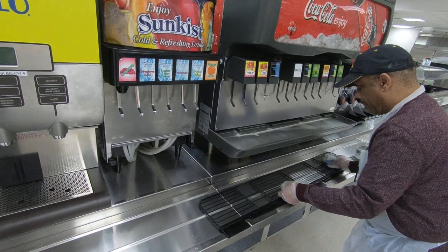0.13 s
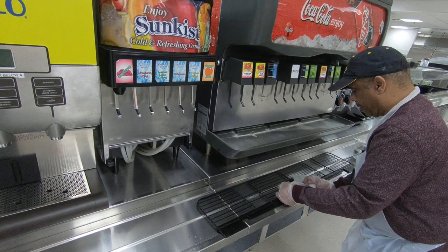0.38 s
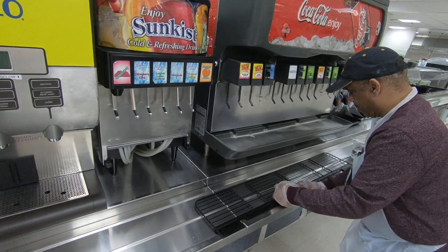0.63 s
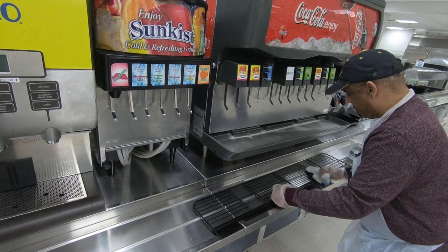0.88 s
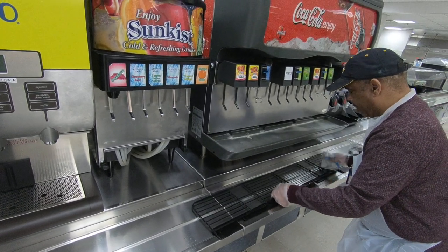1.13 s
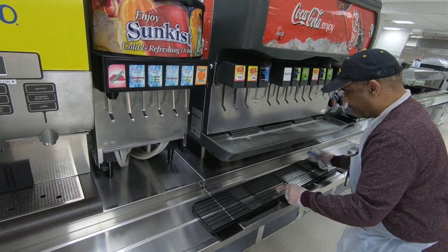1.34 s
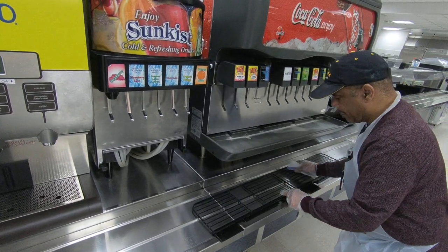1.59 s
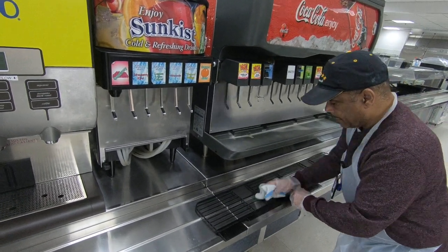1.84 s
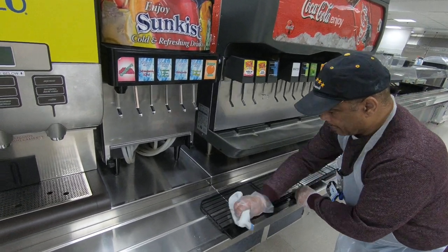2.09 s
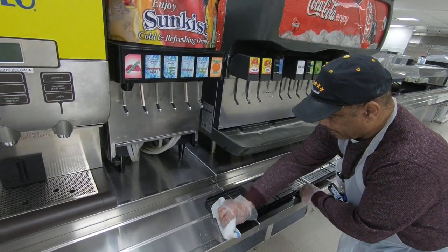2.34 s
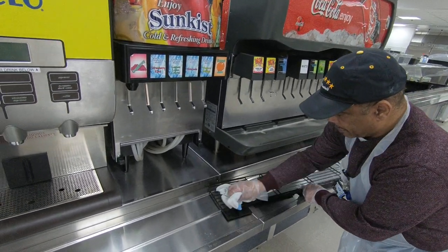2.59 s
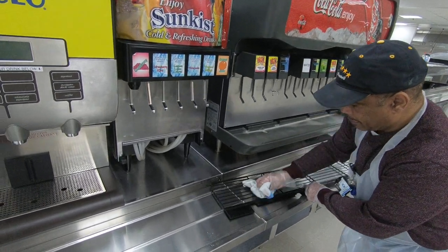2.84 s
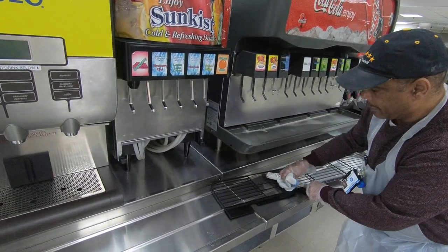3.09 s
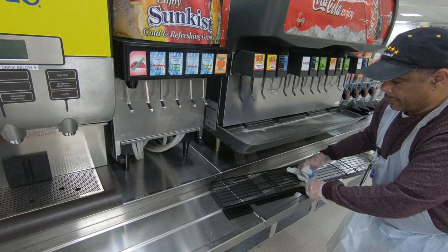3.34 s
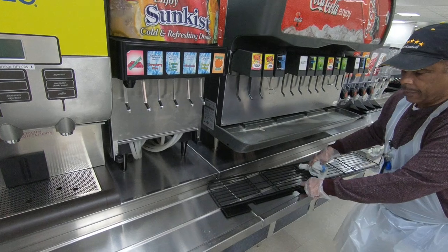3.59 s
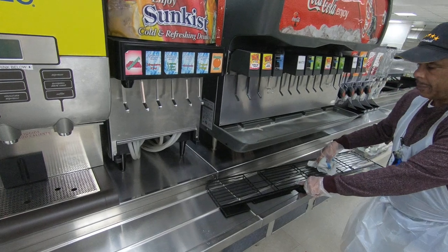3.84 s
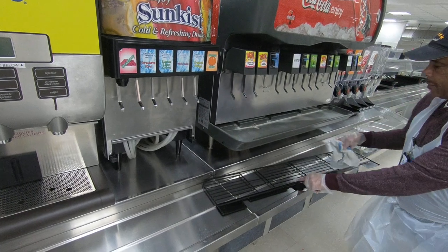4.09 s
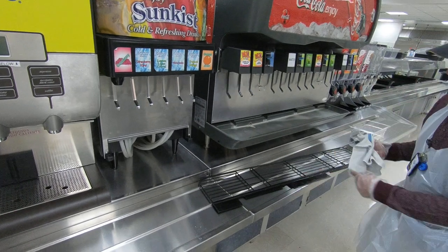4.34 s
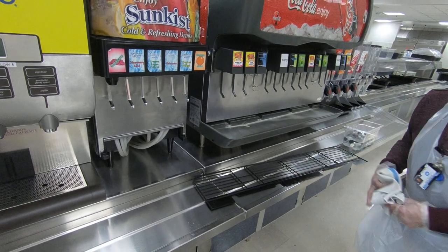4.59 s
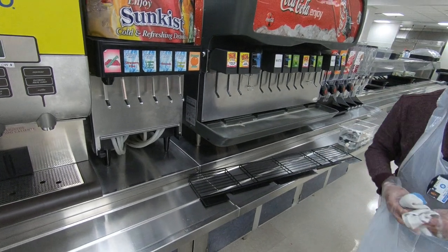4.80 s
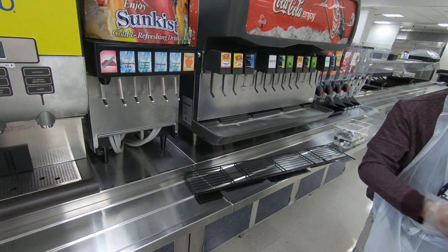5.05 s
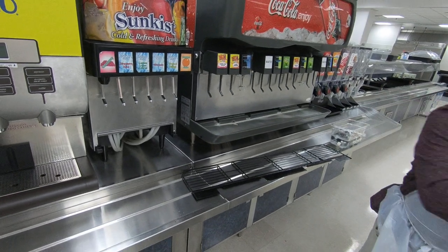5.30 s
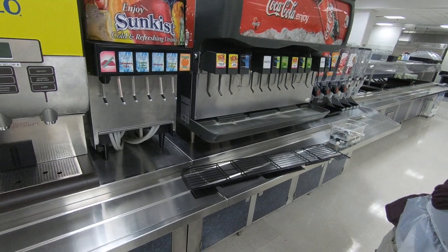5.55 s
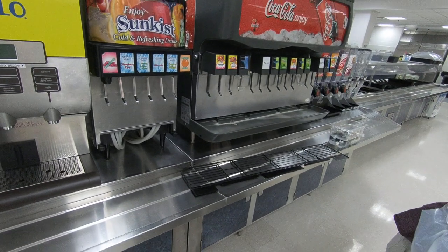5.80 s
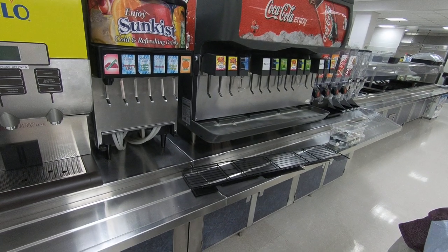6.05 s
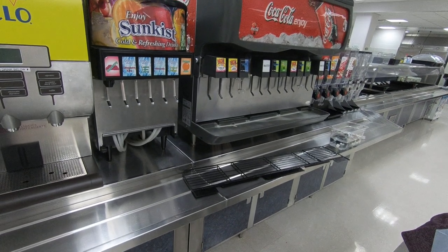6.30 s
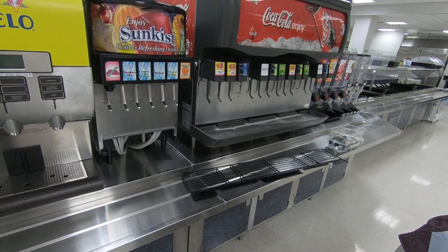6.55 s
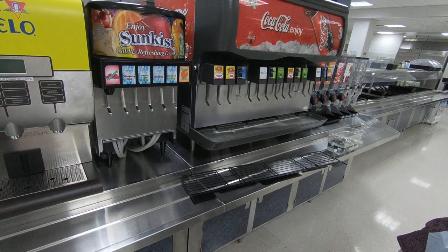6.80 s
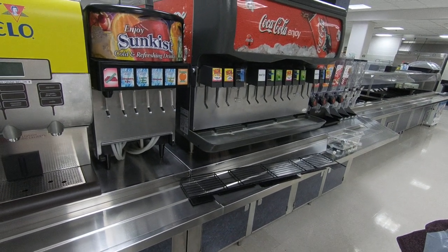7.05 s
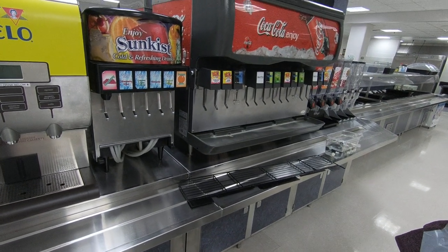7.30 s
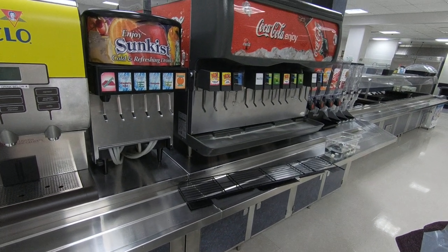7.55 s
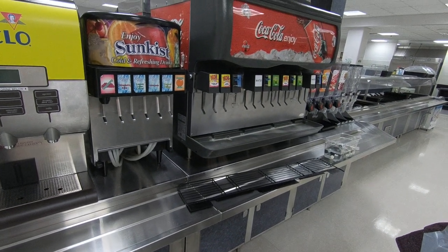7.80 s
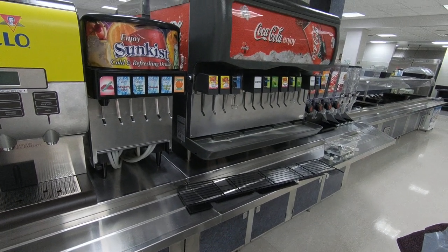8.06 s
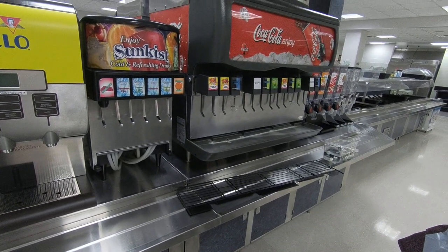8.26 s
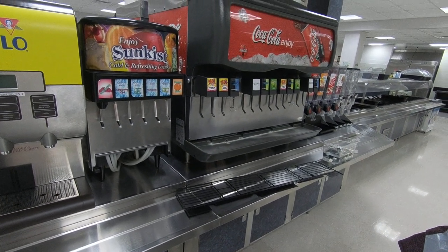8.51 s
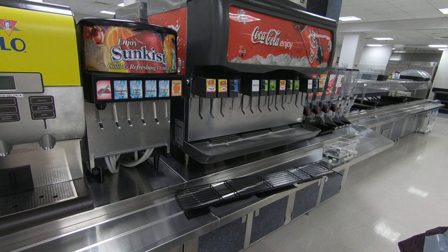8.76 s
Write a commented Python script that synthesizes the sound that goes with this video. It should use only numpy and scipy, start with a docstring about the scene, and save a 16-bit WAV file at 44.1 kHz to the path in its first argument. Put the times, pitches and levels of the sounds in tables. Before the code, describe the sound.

A wire grate lands with a loud clang and deep boom on a steel trough, chatters, then scrapes briefly. More rattles follow, a second heavy bang, lighter scrapes and a last knock. Then someone steps away with dull footfalls and a plastic apron crackling sharply. A low compressor hum and airy hiss fill a large hard hall. Close stereo microphone, dull on top, nearly mono for a while.

```python
"""Wire grate on a steel trough

A wire grate is dropped, rocked and dragged on a steel trough that booms under it, in a large hard hall.
Noisy contacts drive the resonances of bars and sheet; a plastic apron crackles as someone walks off.
Compressors hum and beat as sines that slowly waver in level; the air hisses as flickering noise bands.
Two ports with a dull top pick it up; the stereo image narrows to near mono for a while."""
import sys
import numpy as np
from scipy import signal
from scipy.io import wavfile

SR = 44100
rng = np.random.default_rng(int(sys.argv[2]) if len(sys.argv) > 2 else 0)


def bounce(signal):
    """Save signal as a 16-bit WAV file at the path given by the first command-line argument."""
    frames = np.transpose(np.atleast_2d(signal))
    limited = np.clip(frames, -1, 1)
    pcm = np.round(limited * 32767).astype(np.int16)
    wavfile.write(sys.argv[1], SR, pcm)


def makeup_ratio(level_db):
    """Linear amplitude ratio for a level in decibels (20 dB per factor of ten)."""
    decades = np.asarray(level_db, float) / 20
    return 10 ** decades


N = 392490  # samples

# Colour of the air hiss. Each row: frequency in Hz, relative density in dB.
AIR_COLOUR = [(20, 1.5), (40, 8.5), (85, -16), (160, 3.5), (300, -8.5), (560, -58), (850, -33.5),
              (2400, -34), (3700, -27), (6300, -32), (9000, -57), (15000, -24.5)]
AIR_DB = -48
# Wavering hums. Each row: frequency in Hz, rms level in dB before the slow waver.
HUMS = [(119.95, -60), (237.25, -55), (239.9, -57)]
HUM_IN_STEP_S = .236  # all hums cross zero together here
# Footfalls. Each row: start in seconds, level in dB before the low resonances.
STEPS = [(3.65, -21.5), (5.03, -33), (5.628, -32.5), (6.259, -31.5), (7.241, -31)]

# Hiss of cloth and film sliding. Each row: time in seconds, level in dB.
SLIDING = [(1.8, -77.5), (1.95, -57), (2.9, -68.5), (4.2, -61.5), (4.5, -57.5), (5.3, -57), (5.42, -61),
           (6.15, -63), (6.5, -66), (8.9, -61)]
# Colour of the sliding hiss. Each row: frequency in Hz, relative density in dB.
RUSTLE_COLOUR = [(1500, -8.5), (3500, 7.5), (6000, 11.5), (9000, 2)]
# Spells in which the apron is crumpled. Each row: start in seconds, end in seconds, level in dB.
CRUMPLING = [(6.58, 6.85, -56), (6.99, 7.62, -52.5), (7.72, 7.86, -55.5), (7.97, 8.39, -50.5),
             (8.68, 8.82, -56)]
CRUMPLE_RISE_S, CRUMPLE_T60_S, CRUMPLE_HISS_DB, IDLE_CRINKLE_DB = 0.1, 0.046, -5.5, -69.5
# Loudest snaps of apron and shoes. Each row: start in seconds, peak in dB, pitch in Hz.
SNAPS = [(5.523, -46.5, 6100), (5.638, -43, 3460), (5.855, -50.5, 6100), (6.228, -43, 6350),
         (7.002, -44.5, 1330), (7.069, -43, 1530), (7.246, -37.5, 1820), (7.264, -35.5, 1020),
         (7.334, -36.5, 2140), (7.458, -31.5, 810), (7.47, -29.5, 5700), (7.526, -22, 7200),
         (7.528, -35, 770), (7.569, -36.5, 3700), (7.578, -38.5, 1500), (7.748, -34, 2250),
         (7.856, -36, 5850), (7.976, -34, 1910), (8.075, -32.5, 1110), (8.157, -39.5, 835),
         (8.27, -27, 3920), (8.275, -28.5, 1150)]

# Spells of the grate rocking. Each row: start in seconds, end in seconds, level in dB.
ROCKING = [(0, .09, -23), (.1, .48, -34), (1.25, 1.58, -27.5), (2.55, 2.64, -22.5), (2.66, 2.8, -42),
           (2.9, 3.03, -45), (4.285, 4.36, -31), (4.4, 4.75, -41.5), (7.2, 7.55, -42)]
BOOM_RISE_S, BOOM_T60_S, IDLE_SHAKE_DB = 0.016, 0.57, -54
# Resonances of the trough sheet. Each row: frequency in Hz, width in Hz, relative level in dB.
TROUGH_MODES = [(48.3, 35.3, -7), (100, 28.6, 2), (137, 23.2, 8), (176, 36.4, 4.5), (303, 36, -10),
                (368.4, 49, -13.5), (509, 45, -30.5)]
# Low thumps of trough and steps. Each row: start in seconds, level in dB, pitch in Hz.
THUMPS = [(0.026, -8.5, 134), (0.072, -23.5, 115), (1.28, -25, 137), (2.6, -9.5, 134), (2.663, -10.5, 123),
          (4.286, -22.5, 312), (4.334, -12.5, 132.6), (5.911, -26, 175), (6.905, -24.5, 322),
          (7.284, -28, 191), (7.459, -26, 332), (8.263, -27.5, 92), (8.274, -30, 320)]

# Resonances of the grate. Each row: frequency in Hz, width in Hz before damping, relative level in dB.
GRATE_MODES = [(925, 260, 0), (1400, 200, -4), (2310, 260, -1), (3140, 300, -3), (3630, 300, -1),
               (4900, 400, -9), (5650, 400, -7), (6400, 350, -6), (6970, 370, -16)]
# Drags along the rim. Each row: start in seconds, end in seconds, level in dB,
# broad rasp against the bars in dB.
DRAGS = [(0.407, 0.547, -32, -11.5), (0.661, 0.75, -44.5, -6), (0.945, 1.015, -48, 2),
         (1.144, 1.217, -45, -7.5), (2.44, 2.584, -45.5, -0.5), (3.808, 3.902, -30.5, -11),
         (3.898, 3.96, -34.5, -11.5), (4.633, 4.658, -32, -3), (4.659, 4.757, -43.5, -1.5),
         (4.757, 4.876, -42.5, 1.5)]
# Blows of grate on trough. Each row: start in seconds, level in dB, brightest frequency in Hz.
BLOWS = [(0.0014, -6.5, 4000), (0.068, -26, 2650), (0.08, -18, 3180), (0.148, -17, 3460), (0.22, -21, 2930),
         (0.2782, -30, 5700), (0.3706, -28.5, 5500), (0.952, -38, 2950), (1.166, -31.5, 3030),
         (1.2346, -24.5, 1880), (1.263, -24.5, 3340), (1.3258, -19, 3370), (1.341, -33.5, 2500),
         (1.376, -22.5, 3220), (1.406, -25.5, 3120), (1.485, -32.5, 4700), (1.511, -29, 3170),
         (1.572, -38.5, 1760), (1.624, -46, 1200), (2.549, -14, 3060), (2.567, -16.5, 2570),
         (2.6608, -32.5, 1340), (3.2363, -43, 4500), (3.478, -45, 3400), (3.5948, -36.5, 4640),
         (3.993, -42.5, 2300), (4.155, -34.5, 3240), (4.2842, -19, 3380), (4.613, -40.5, 3830)]
# The rattle dies sooner once a hand steadies the grate.
LOOSE_T60_S, STEADIED_T60_S, STEADIED_FROM_S = 0.41, 0.28, 2
# Free bars that ring on. Each row: frequency in Hz, relative level in dB.
RINGING_BARS = [(509, -30.5), (1220, -45.5), (3740, -28)]
RINGING_WIDTH_HZ = 9

HALL_T60_S = 0.81
# Stereo image. Each row: time in seconds, width in dB, lean to the right from 0 to 1.
STEREO_WIDTH = [(0, -2, 0.12), (.75, -7, 0.07), (.95, -28, 0), (2.38, -45, 0.01), (2.55, -12, 0.02),
                (4.6, -1.5, 0.16), (5.1, 1, 0.25)]
# Left port minus right port. Each row: frequency in Hz, width in Hz, level in dB.
PORT_DIFFERENCE = [(150, 140, -19), (510, 250, -3), (930, 510, 1.5), (6350, 6200, 3.5), (10800, 18000, 4.5)]


def rms_one(x):
    """Scale to unit rms."""
    return x / np.sqrt(np.mean(x ** 2) + 1e-20)


def in_time(rows):
    """Columns of a curve at every sample."""
    s, *columns = np.transpose(rows)
    return [np.interp(np.arange(N) / SR, s, column) for column in columns]


def drift(rate):
    """Slow random wander of spread 1, made at one point in 40 samples; rate in Hz."""
    r = np.exp(-80 * np.pi * rate / SR)
    white = rng.standard_normal(N // 40 + 2002)
    slow = signal.lfilter([1], [1, -2 * r, r * r], white)[2000:]  # skip the run-in
    return np.interp(np.arange(N) / 40, np.arange(len(slow)), rms_one(slow))


def resonance(x, hz, width_hz):
    """Two-pole band-pass with gain 1 on top."""
    r = np.exp(-np.pi * max(width_hz, 5) / SR)
    zeros = np.array([1, 0, -1]) * (1 - r * r) / 2
    poles = [1, -2 * r * np.cos(2 * np.pi * hz / SR), r * r]
    return signal.lfilter(zeros, poles, x + 1e-18)


def body(x, modes):
    """Resonances in parallel, signs alternating."""
    return sum((-1) ** k * makeup_ratio(db) * resonance(x, hz, width) for k, (hz, width, db) in enumerate(modes))


def grains(spread_db):
    """Dense contacts: mostly small, now and then a large one; rms 1."""
    size_db = spread_db * np.minimum(rng.exponential(1, N), 5)
    return rms_one(rng.standard_normal(N) * makeup_ratio(size_db))


def coloured(spectrum, patchy_db):
    """Half-octave bands of noise, each flickering on its own, the treble less; rms 1."""
    out, edges = 0, 20 * 2 ** np.arange(0, 10, .5)
    hz, level = np.transpose(spectrum)
    white = rng.standard_normal((2, N))  # neighbouring bands take different noise
    for k, (low, high) in enumerate(zip(edges, edges[1:])):
        band_pass = signal.butter(2, [low, high], "band", fs=SR, output="sos")
        band = signal.sosfilt(band_pass, white[k % 2])
        db = np.interp(np.log(low * high) / 2, np.log(hz), level)
        flicker_db = patchy_db * min(1, (300 / low) ** .5) * drift(12.3)
        out = out + band * makeup_ratio(db + flicker_db)
    return rms_one(out)


def burst(contacts, s, t60, rise_s):
    """Start sample and a dying run of contacts from that moment."""
    at = round(s * SR)
    t = np.arange(min(int(.45 * SR), N - at)) / SR
    rise = np.minimum(1, (t + 1e-5) / rise_s)
    return at, contacts[at:at + len(t)] * makeup_ratio(-60 * t / max(t60, .01)) * rise


def spells(rows, rise_s, t60, idle_db):
    """Gain that rises at each start, holds to the end and then dies, summed in power over an idle level."""
    t, power = np.arange(N) / SR, makeup_ratio(idle_db) ** 2
    for start, end, db in rows:
        rise = np.clip((t - start) / rise_s + (start <= 0), 0, 1)  # already up if it starts at zero
        power = power + (rise * makeup_ratio(db - 60 * np.maximum(t - end, 0) / t60)) ** 2
    return np.sqrt(power)


def air(patchy_db):
    """Air hiss: broad noise whose bands flicker independently."""
    return makeup_ratio(AIR_DB) * coloured(AIR_COLOUR, patchy_db)


def compressors():
    """Mains hum and a motor running just below it: they beat, and the whole wavers."""
    t = np.arange(N) / SR - HUM_IN_STEP_S
    hum = sum(np.sqrt(2) * makeup_ratio(db) * np.sin(2 * np.pi * hz * t) for hz, db in HUMS)
    return makeup_ratio(2.3 * drift(2.3)) * hum


def footfalls():
    """Dull shudders of the floor that reach the two ports out of step."""
    out, shaking = np.zeros(N), rng.standard_normal(N)
    for s, db in STEPS:
        at, run = burst(shaking, s, 0.34, rise_s=0.0035)
        out[at:at + len(run)] += makeup_ratio(db) * run
    return makeup_ratio(20.0) * resonance(resonance(out, 150, 70), 150, 70)


def small_folds():
    """Random small folds tear for a few milliseconds, each ringing at one of 14 pitches; rms 1."""
    contacts = grains(2.9)
    happens = rng.random(N) < 180 * makeup_ratio(6 * drift(22)) / SR  # around 180 a second, in flurries
    folds = happens * makeup_ratio(3.5 * np.minimum(rng.exponential(1, N), 4))
    pitches, dealt = np.geomspace(700, 7000, 14), rng.integers(0, 14, N)
    tearing = np.exp(-1 / (0.0099 * SR))
    out = 0
    for k, hz in enumerate(pitches):
        tears = signal.lfilter([1], [1, -tearing], folds * (dealt == k) + 1e-18)
        out = out + resonance(contacts * tears, hz, 0.095 * hz) * (hz / 1000) ** -.6
    return rms_one(out)


def apron():
    """Stiff film hisses as it slides; each fold that snaps rings briefly at its own pitch."""
    crumpled = spells(CRUMPLING, CRUMPLE_RISE_S, CRUMPLE_T60_S, IDLE_CRINKLE_DB)
    hiss = np.hypot(makeup_ratio(in_time(SLIDING)[0]), makeup_ratio(CRUMPLE_HISS_DB) * crumpled)
    out = hiss * makeup_ratio(4.1 * drift(11)) * coloured(RUSTLE_COLOUR, patchy_db=-0.5)
    out += crumpled * small_folds()
    contacts = grains(2.9)
    for s, db, hz in SNAPS:
        at, run = burst(contacts, s, 0.065, rise_s=0.0011)
        pitched = resonance(resonance(run, hz, 0.33 * hz), hz, 0.33 * hz)
        snap = pitched + makeup_ratio(-15.5) * resonance(run, 3600, 7200)
        out[at:at + len(run)] += makeup_ratio(db) * snap / np.abs(snap).max()
    return out


def trough():
    """The sheet booms while the grate rocks on it; single soft knocks ring at their own pitch."""
    rocking = spells(ROCKING, BOOM_RISE_S, BOOM_T60_S, IDLE_SHAKE_DB) * makeup_ratio(0.8 * drift(2.8))
    out = rocking * rms_one(body(rng.standard_normal(N), TROUGH_MODES))
    t = np.arange(int(.3 * SR)) / SR
    for s, db, hz in THUMPS:
        at = round(s * SR)
        decay = makeup_ratio(-60 * t * hz / 13.7)  # down 60 dB in 13.7 cycles
        knock = (1 - np.exp(-t / 0.0011)) ** 2 * decay * np.sin(2 * np.pi * hz * t)
        out[at:at + len(t)] += makeup_ratio(db) * knock[:N - at]
    return out


def bars(drive, broad_db, damping, detune=np.ones(len(GRATE_MODES))):
    """One drive per grate resonance; the last two feed the many weak modes that merge into broad bands."""
    rings = sum((-1) ** k * makeup_ratio(db) * resonance(drive[k], hz * detune[k], damping * width)
                for k, (hz, width, db) in enumerate(GRATE_MODES))
    low = resonance(drive[-2], 1450, 780)
    low = low + makeup_ratio(7.5) * resonance(drive[-2], 410, 180) + makeup_ratio(-5.0) * resonance(drive[-2], 852, 270)
    high = makeup_ratio(-6.5) * resonance(drive[-1], 2600, 4200)
    return rings + makeup_ratio(broad_db) * (low + high)


def drags():
    """Stick-slip contacts feed the bars while a stroke lasts; each grip detunes and favours other bars."""
    slips, out = makeup_ratio(0.5 * drift(44)) * grains(1.6), np.zeros(N)
    luck = rng.standard_normal((len(DRAGS), 2, len(GRATE_MODES) + 2))
    for (start, end, db, broad_db), (favour, detune) in zip(DRAGS, luck):
        at, t = round(start * SR), np.arange(int((end - start + .1) * SR)) / SR
        pressure = np.clip(np.minimum(t / 0.029, (end - start - t) / 0.024), 0, 1)
        drive = makeup_ratio(1.2 * favour[:, None]) * pressure * slips[at:at + len(t)]
        # a light touch damps the bars less
        out[at:at + len(t)] += makeup_ratio(db) * bars(drive, broad_db, damping=.5, detune=1 + .012 * detune)
    return out


def blows():
    """Each blow cracks, then sets the loose bars chattering."""
    contacts = grains(1.7)
    hz = np.append(np.array(GRATE_MODES)[:, 0], [1100, 3500])  # the last two stand for the broad bands
    drive, cracks = np.zeros((len(hz), N)), np.zeros(N)
    luck_db = rng.normal(0, 1.7, (len(BLOWS), len(hz)))
    for (s, db, top_hz), chance_db in zip(BLOWS, luck_db):
        # dull blows rattle slightly longer
        t60 = (LOOSE_T60_S if s < STEADIED_FROM_S else STEADIED_T60_S) * (3000 / top_hz) ** 0.075
        at, run = burst(contacts, s, t60, rise_s=0.001)
        t, width = np.arange(len(run)) / SR, 0.33 * top_hz
        # the struck bar answers first, briefly
        crack = resonance(resonance(run * makeup_ratio(-60 * t / 0.059), top_hz, width), top_hz, width)
        cracks[at:at + len(run)] += makeup_ratio(db + 8.5) * crack
        favour_db = chance_db - 4 * np.log2(hz / top_hz) ** 2  # modes near the brightest pitch answer most
        fade_db = 60.0 * np.outer(hz / 1000, t)  # high modes die sooner
        drive[:, at:at + len(run)] += makeup_ratio(db - 4.0 + favour_db[:, None] - fade_db) * run
    ringing = body(drive[-2], [(f, RINGING_WIDTH_HZ, db) for f, db in RINGING_BARS])
    ringing = ringing * np.sqrt(SR / RINGING_WIDTH_HZ) * 0.043  # narrow bands let little noise through
    return cracks + bars(drive, broad_db=6.0, damping=0.77) + ringing


def hall(x):
    """A dying, darkening noise tail, other on each of two paths."""
    t = np.arange(int(1.2 * SR)) / SR
    white = rng.standard_normal((2, len(t)))
    dull = signal.lfilter([.15], [1, -.85], white)
    tail = dull * makeup_ratio(-60 * t / HALL_T60_S) + 1.15 * white * makeup_ratio(-60 * t / 0.27)
    tail = tail * np.minimum(1, t / 0.0014)
    tail = tail / np.sqrt(np.sum(tail ** 2, axis=1, keepdims=True))
    return signal.fftconvolve(x[None], tail, axes=1)[:, :N]


def scene():
    """Sum and difference of the two ports, then left and right."""
    width_db, lean = in_time(STEREO_WIDTH)
    ahead, dragged, film = blows() + trough(), drags(), apron()
    wet_mid, wet_side = hall(ahead + dragged + makeup_ratio(-1.0) * film)
    mid = ahead + dragged + film + makeup_ratio(-9) * wet_mid + compressors() + air(patchy_db=5.5)
    diffuse = makeup_ratio(3.0) * wet_side + makeup_ratio(16.0) * air(patchy_db=6.5)
    # sources off the axis differ most between the ports
    direct = makeup_ratio(-21) * ahead + makeup_ratio(14.0) * dragged + makeup_ratio(-21.0) * film
    side = body(direct + diffuse, PORT_DIFFERENCE) + footfalls()
    late_lows = 11.0 * np.gradient(resonance(mid, 240, 250))  # the lows also reach the left port later
    side = makeup_ratio(width_db) * side - lean * (mid + late_lows)
    return np.array([mid + side, mid - side])


def roll_off(x):
    """The treble ends steeply here."""
    return signal.sosfilt(signal.butter(12, 15300, fs=SR, output="sos"), x)


def record(dry):
    """The microphone dips in the presence range, falls off steeply but for a faint high peak, and hisses."""
    dipped = dry - .55 * resonance(dry, 4300, 700)
    dull = signal.sosfilt(signal.butter(7, 7100, fs=SR, output="sos"), dipped)
    peaked = dull - makeup_ratio(-31) * resonance(dry, 9300, 5000)
    mix = peaked + makeup_ratio(-83.0) * resonance(rng.standard_normal(N), 9000, 6900)
    return roll_off(mix)


dry = scene()
out = record(dry)
bounce(out)
```